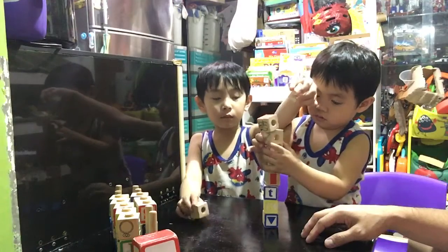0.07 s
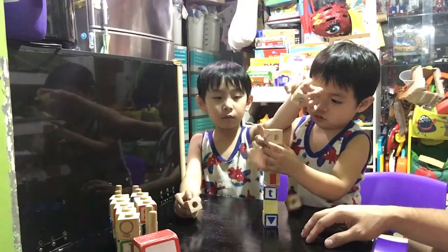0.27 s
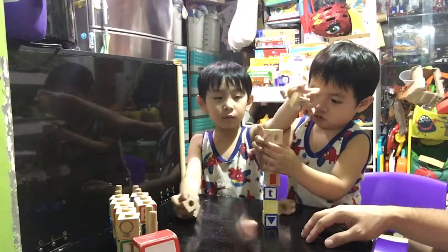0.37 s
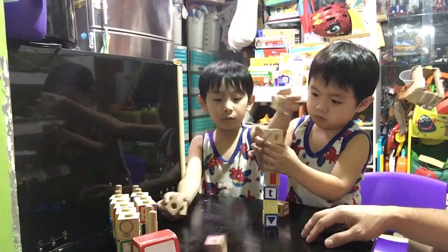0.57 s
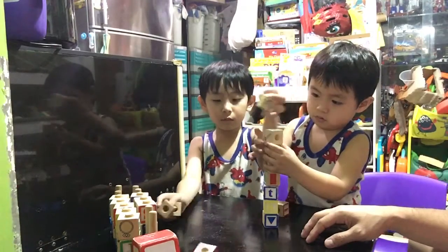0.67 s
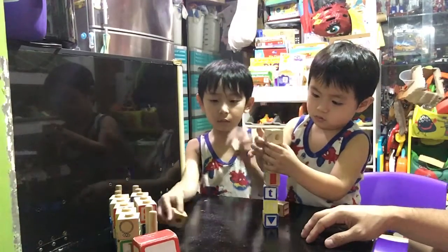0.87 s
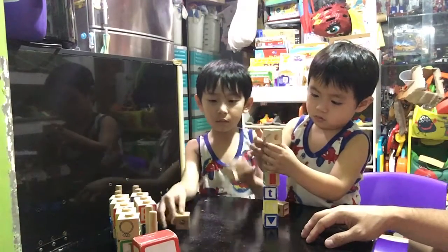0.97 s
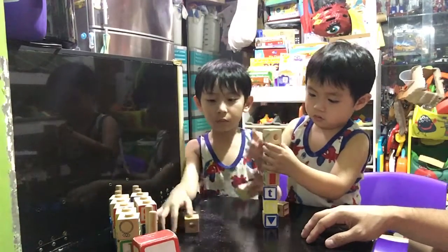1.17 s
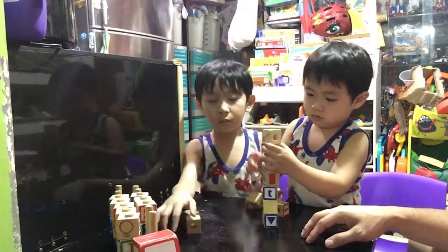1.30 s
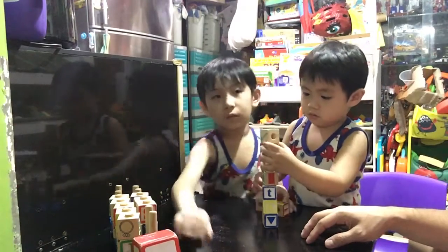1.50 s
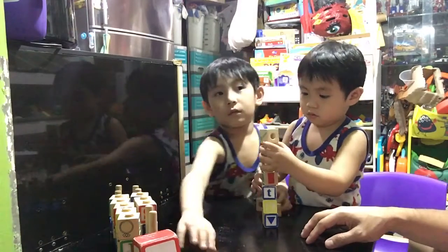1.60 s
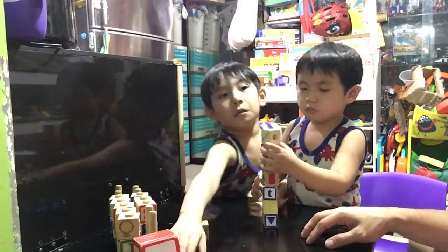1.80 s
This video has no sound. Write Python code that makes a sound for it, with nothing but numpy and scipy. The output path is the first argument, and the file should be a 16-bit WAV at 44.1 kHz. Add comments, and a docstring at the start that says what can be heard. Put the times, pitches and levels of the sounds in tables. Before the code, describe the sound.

Wooden toy blocks fall onto a hard table with loud clacks, then bounce and tumble in a quick, uneven run of knocks. Dull bumps and a low rumble lie underneath, heard close by in a small, quiet room.

```python
"""A low rumble and a dull bump, then wooden toy cubes clatter onto a hard table, bounce and tumble.
Each impact excites damped modes of cube and table; a flat surface close by reflects the clack,
and a small furnished room lets it fade. More dull bumps lie underneath, and at the very end
a hand starts to scrape one cube along. A limiter holds down the hardest blows."""
import sys
import numpy as np
from scipy import signal
from scipy.fft import rfft, irfft
from scipy.io import wavfile
from scipy.ndimage import uniform_filter1d, minimum_filter1d

SR = 44100
rng = np.random.default_rng(int(sys.argv[2]) if len(sys.argv) > 2 else 0)


def generate_wav(signal):
    """Clip the signal to [-1, 1] and save it as 16-bit WAV at the path in sys.argv[1]."""
    frames = np.transpose(np.atleast_2d(signal))
    scaled = np.clip(frames, -1, 1) * 32767
    pcm = np.round(scaled).astype(np.int16)
    wavfile.write(sys.argv[1], SR, pcm)


N = 81585

# spectrum of the room tone (frequency [Hz], relative level [dB])
ROOM_TONE_SPECTRUM = [(150, -4.5), (430, 9.5), (1300, 4), (3000, -7.5), (9000, -26.5), (12000, -32),
                      (15000, -36)]
# envelope of the rumble (time [s], level [dB])
RUMBLE_ENVELOPE = [(0, -38), (.3, -45.5), (.65, -39.5), (1.02, -36.5), (1.2, -54.5), (1.5, -63),
                   (1.64, -40.5), (1.85, -36.5)]
# spectrum of the rumble (frequency [Hz], relative level [dB])
RUMBLE_SPECTRUM = [(22, -41), (48, -0.5), (95, -7.5), (190, -17.5), (600, -73.5)]
# dull low bumps (time [s], level [dB], frequency [Hz], t60 [s])
LOW_BUMPS = [(0.127, -27.5, 74, 0.35), (0.254, -23, 71.8, 0.3), (0.259, -17.5, 154, 0.042),
             (0.467, -14.5, 183, 0.091), (0.487, -11, 60.5, 0.083), (0.652, -21, 146, 0.099),
             (0.768, -23.5, 132, 0.062), (0.824, -18, 152.4, 0.054), (1.642, -23, 76.3, 0.086),
             (1.77, -21.5, 65, 0.15), (1.796, -10.5, 95.5, 0.038)]
# modes of the scraping cube (frequency [Hz], relative level [dB], t60 [s])
SCRAPE_MODES = [(1095, 1, 0.026), (1930, 3.5, 0.0043), (2930, -8, 0.016)]
# spectrum of grazing edges (frequency [Hz], relative level [dB])
RATTLE_SPECTRUM = [(400, -11), (1100, 3.5), (2200, -3.5), (12000, -56.5)]
# reverberation of the room (frequency [Hz], t60 [s], gain [dB])
REVERB_BANDS = [(100, 0.56, -7), (1190, 0.15, -3.5), (3020, 0.22, -6.5), (7200, 0.18, -4),
                (15000, 0.24, -3.5)]
# modes of cube and table top (frequency [Hz], relative level [dB], t60 [s])
CUBE_MODES = [(796, -1, 0.042), (939, -0.5, 0.1), (1154, 1, 0.073), (1475, 0, 0.1), (1734, 7.5, 0.027),
              (1945, 8, 0.024), (2318, 1.5, 0.041), (2526, -4.5, 0.029), (2776, 9, 0.024), (3288, 3, 0.051),
              (7080, -9.5, 0.054)]
# bending modes of the whole table (frequency [Hz], relative level [dB], t60 [s])
BENDING_MODES = [(163, -6, 0.14), (203.2, -1, 0.11), (242.5, 0, 0.074), (307.6, 0.5, 0.057),
                 (422, 0.5, 0.023), (524.5, 1.5, 0.06)]
# spectrum of the dry clack (frequency [Hz], relative level [dB])
CLACK_SPECTRUM = [(110, -17), (520, -9), (820, -2.5), (1500, 3), (3200, 1.5), (4500, -6), (6000, -12.5),
                  (8000, -22), (10300, -31.5), (11600, -28.5), (15000, -37.5)]
# cube impacts, with relative levels; a hard edge has a high cutoff
# (time [s], level [dB], cutoff [Hz], table thud [dB], ring frequency [Hz], ring [dB], edge tick [dB])
IMPACTS = [ (0.2033, -0.5, 4600, -14.5, 1210, -5.5, -8), (0.2081, -2.5, 4700, -8, 730, -1.5, -1),
           (0.2144, -5.5, 4360, -18, 1900, -9, -0.5), (0.2934, -14.5, 1800, 6, 778, 1.5, -13),
           (0.3547, -10.5, 1680, -12, 934, -6, -31), (0.3709, -12, 1620, -23, 1150, -22, -31),
           (0.3860, -11.5, 1750, -2, 1036, -3.5, -23), (0.434, 3, 3300, -10, 793, -3, -20.5),
           (0.439, 1, 3730, -2, 1823, 1.5, -9.5), (0.4460, 1, 3840, -2, 1040, 1, -8),
           (0.4913, 1.5, 800, -2.5, 408, -6, -22), (0.5234, -10, 3740, -28, 2960, -3.5, -15),
           (0.5783, -11, 4100, -14, 2940, -3.5, -22), (0.5998, 1, 2230, -8.5, 1398, -8, -20.5),
           (0.6523, -2.5, 3180, -12.5, 1477, -0.5, -11), (0.725, -5, 2880, -7, 1504, -3.5, -17.5),
           (0.8141, -19, 1790, 5.5, 1160, -8, -45), (0.889, -6.5, 5100, -18, 3380, 2, -17.5),
           (0.8918, -2, 3600, -4, 1534, 1.5, -16), (0.9555, -9.5, 3770, 0.5, 1720, -1.5, -24.5),
           (0.986, -15.5, 3200, -2, 1420, 3.5, -38), (1.001, -14.5, 3070, -1, 1448, 3.5, -18),
           (1.0465, -8, 5100, -11, 1230, -6, -12), (1.1699, -6.5, 3610, -1, 1137, 0, -13.5),
           (1.2157, -8, 3640, -10, 2440, -5, -14), (1.2460, -11, 3630, -7, 1490, -12, -19),
           (1.2680, -14, 3220, -13, 2340, -4, -19), (1.3053, -4.5, 3100, -3.5, 1135, 0.5, -18),
           (1.3163, -4.5, 3100, -6, 1448, -0.5, -19), (1.3893, -14.5, 2140, -0.5, 1104, 0, -28),
           (1.4317, -11, 3680, -10.5, 3370, -13, -19.5), (1.507, -7, 3950, -21, 3060, -2.5, -9.5),
           (1.5332, -5, 3560, -4, 2410, -4.5, -16), (1.542, -9.5, 3930, -7, 2360, -7, -22),
           (1.555, -14.5, 3600, -3.5, 1490, -4, -17), (1.5630, -10, 4150, -17, 2390, 1, -19),
           (1.5775, -13.5, 5540, -28, 3180, 1, -18), (1.581, -7.5, 4470, -5, 2330, -2.5, -18.5),
           (1.597, -15, 3960, -1, 1526, 1, -11), ]

RING_SAMPLES = 16384
IMPACT_DB, CUBE_MODES_DB, THUD_DB, RING_REVERB_DB = 11.5, -5, -6, -9.5
REFLECTION_S, REFLECTION_DB = .0026, 7.5  # from the flat surface close by


def undb(db):
    """Amplitude ratio of a level in decibels."""
    return 10 ** (np.asarray(db) / 20)


def unit(x):
    """Normalisation to unit energy."""
    return x / np.sqrt(np.sum(x ** 2))


def decay(t, t60):
    """Exponential damping: 60 dB are lost in t60 seconds."""
    return np.exp(-np.log(1000) * t / t60)


def gain_curve(points, hz):
    """Interpolation of (frequency [Hz], level [dB]) points over log frequency, as gains."""
    f, db = np.array(points).T
    return undb(np.interp(np.log(hz + 1), np.log(f), db))


def minimum_phase(gain):
    """Minimum phase: the quickest causal response that has these gains."""
    cepstrum = irfft(np.log(gain + 1e-9))
    half = len(cepstrum) // 2
    return np.exp(rfft(np.r_[cepstrum[0], 2 * cepstrum[1:half], np.zeros(half)]))


def whitened(x, bins):
    """Whitening: the spectrum of x with broad humps evened out and fine peaks kept."""
    spectrum = rfft(x)
    smooth_power = uniform_filter1d(abs(spectrum) ** 2, bins)
    return spectrum / minimum_phase(np.sqrt(smooth_power + 1e-12))


def coloured(x, points):
    """Spectral shaping of a full-length signal, scaled to rms 1."""
    y = irfft(rfft(x) * gain_curve(points, np.fft.rfftfreq(N, 1 / SR)), N)
    return y / np.std(y)


def add(out, start_s, x):
    """Superposition of a sound at its start time."""
    i = int(start_s * SR)
    out[i:i + len(x)] += x[:max(N - i, 0)]


def modal_response(modes, t, scatter_db=1):
    """Sum of damped modes; strength and sign are random, as they depend on where a blow lands."""
    draws = rng.standard_normal((len(modes), 2))
    return unit(sum(np.sign(side) * undb(db - scatter_db * miss) * decay(t, t60)
                    * np.sin(2 * np.pi * hz * t) for (hz, db, t60), (miss, side) in zip(modes, draws)))


def catches(per_s):
    """Poisson impulses: tiny random pushes of wood on wood."""
    return (rng.random(N) < per_s / SR) * np.sign(rng.standard_normal(N))


def background(t):
    """Filtered noise: a low rumble that comes and goes, and steady room tone."""
    envelope = undb(np.interp(t, *np.array(RUMBLE_ENVELOPE).T))
    rumble = envelope * coloured(rng.standard_normal(N), RUMBLE_SPECTRUM)
    room_tone = undb(-50) * coloured(rng.standard_normal(N), ROOM_TONE_SPECTRUM)
    return rumble + room_tone


def bumps():
    """Damped oscillation after soft blows: low tones that swell quickly and die."""
    out, t = np.zeros(N), np.arange(2 * RING_SAMPLES) / SR
    for start, db, hz, t60 in LOW_BUMPS:
        attack = 1 - np.exp(-4 * hz * t)
        add(out, start, undb(db) * np.sin(2 * np.pi * hz * t) * decay(t, t60) * attack)
    return out


def scrape(t, start_s=1.822, attack_s=.026, level_db=-30):
    """Frictional excitation: many tiny catches keep the modes of a sliding cube ringing."""
    ringing = signal.fftconvolve(catches(per_s=3100), modal_response(SCRAPE_MODES, t[:RING_SAMPLES]))[:N]
    onset = np.clip((t - start_s) / attack_s, 0, 1)
    return undb(level_db) * onset * ringing / np.std(ringing)


def rattle(t, start_s=.36, end_s=1.61, level_db=-44.5):
    """Shot noise: edges and corners graze faintly while the cubes tumble."""
    tumbling = (t >= start_s) & (t <= end_s)
    return undb(level_db) * coloured(catches(per_s=700) * tumbling, RATTLE_SPECTRUM)


def room_response(t, f, delay_s=.004, early_db=-5):
    """Reverberation as a frequency response: early reflections and a tail whose bass lasts longest."""
    band_hz, t60s, dbs = np.array(REVERB_BANDS).T
    noise, tail = rfft(rng.standard_normal(len(t))), 0
    for share, t60 in zip(np.eye(len(band_hz)), t60s):
        band = irfft(noise * np.interp(np.log(f + 1), np.log(band_hz), share))
        tail = tail + band * unit(decay(t, t60))
    early = undb(early_db) * unit(rng.standard_normal(len(t)) * decay(t, t60=.16))
    colour = minimum_phase(gain_curve(np.c_[band_hz, dbs], f))
    delay = np.exp(-2j * np.pi * f * int(delay_s * SR) / SR)
    return whitened(tail + early, bins=90) * colour * delay


def click_spectrum(t, grain_db=17):
    """Interference of a click, its close reflection and dense wood modes, modelled as decaying noise."""
    burst = undb(grain_db) * unit(rng.standard_normal(len(t)) * decay(t, t60=.046))
    burst[0] += 1
    burst[int(REFLECTION_S * rng.uniform(.8, 1.2) * SR)] += undb(REFLECTION_DB)
    return whitened(burst, bins=180)


def cube_impacts(contact_order=6.25):
    """Impact excitation: a clack, a table thud and one clear ring; a soft contact acts as a low-pass."""
    out, t = np.zeros(N), np.arange(RING_SAMPLES) / SR
    f = np.fft.rfftfreq(RING_SAMPLES, 1 / SR)
    colour = gain_curve(CLACK_SPECTRUM, f)
    colour = minimum_phase(colour / np.sqrt(np.mean(colour ** 2)))
    ring_envelope = decay(t, t60=.034) * (1 - decay(t, 2 * REFLECTION_S))
    taper = np.cos(np.pi / 2 * t / t[-1])
    for start, db, cutoff_hz, thud_db, ring_hz, ring_db, tick_db in IMPACTS:
        wood = click_spectrum(t) * colour + undb(CUBE_MODES_DB) * rfft(modal_response(CUBE_MODES, t))
        contact = 1 / np.hypot(1, (f / cutoff_hz) ** contact_order) + undb(tick_db)
        thud = undb(THUD_DB + thud_db) * rfft(modal_response(BENDING_MODES, t))
        clack = wood * minimum_phase(contact) + thud
        ring = undb(ring_db) * rfft(unit(ring_envelope * np.sin(2 * np.pi * ring_hz * t)))
        reverb = room_response(t, f) * (clack + undb(RING_REVERB_DB) * ring)
        add(out, start, undb(IMPACT_DB + db) * irfft(clack + ring + reverb) * taper)
    return out


def scene():
    """Superposition of all sources in one channel."""
    t = np.arange(N) / SR
    return (background(t) + bumps() + scrape(t) + rattle(t) + cube_impacts())[None]


def record(dry, low_cut_hz=40, top_hz=15600, ceiling=.969):
    """Peak limiting between two filters: the gain dips briefly around the loudest blows."""
    highpass = signal.butter(2, low_cut_hz, "highpass", fs=SR, output="sos")
    lowpass = signal.ellip(10, .2, 70, top_hz, fs=SR, output="sos")
    x = signal.sosfilt(highpass, dry)
    safe_gain = np.minimum(1, ceiling / (abs(x) + 1e-9))
    gain = uniform_filter1d(minimum_filter1d(safe_gain, size=61), size=61)
    return signal.sosfilt(lowpass, x * gain)


dry = scene()
out = record(dry)
generate_wav(out)
```